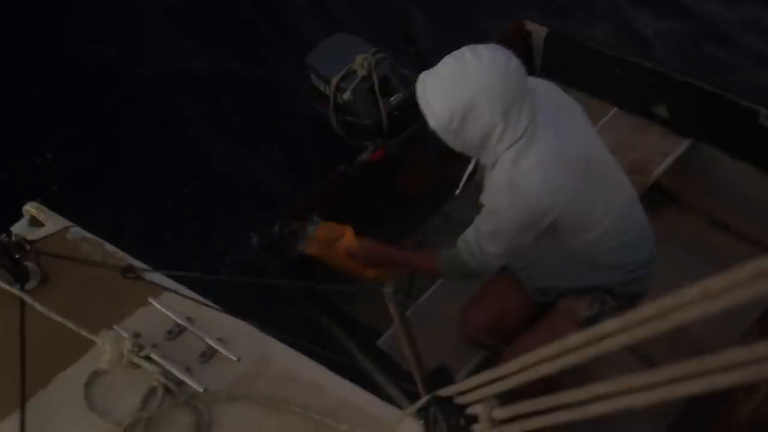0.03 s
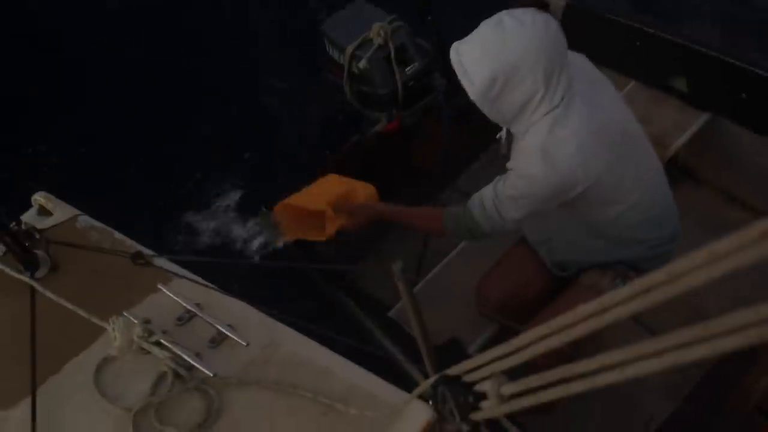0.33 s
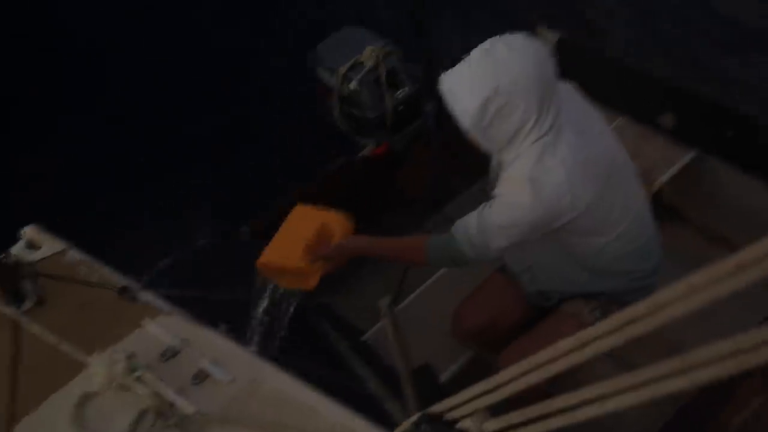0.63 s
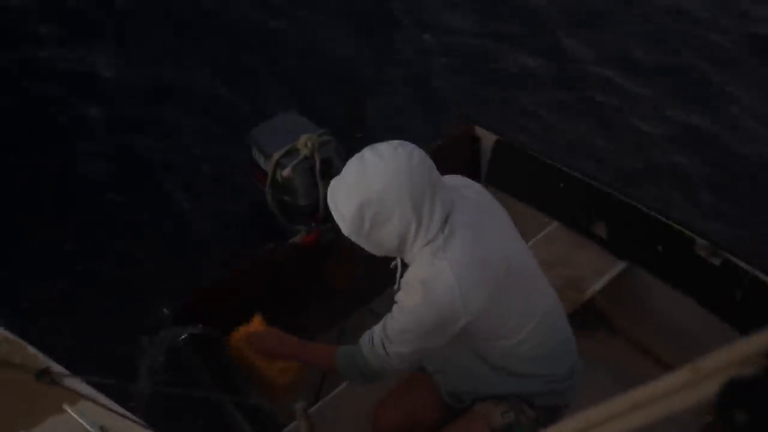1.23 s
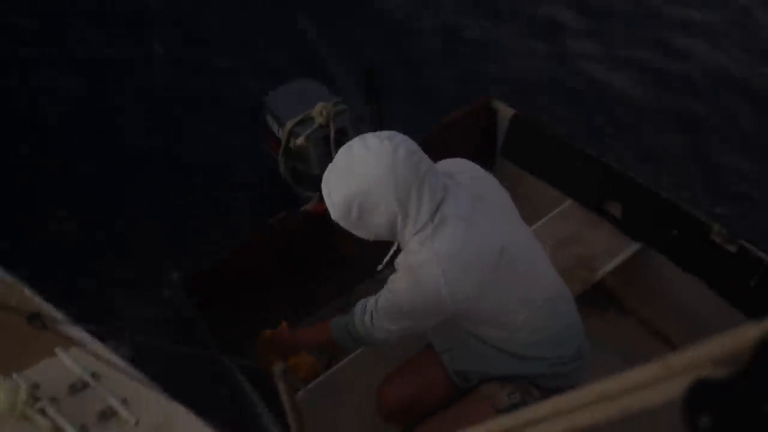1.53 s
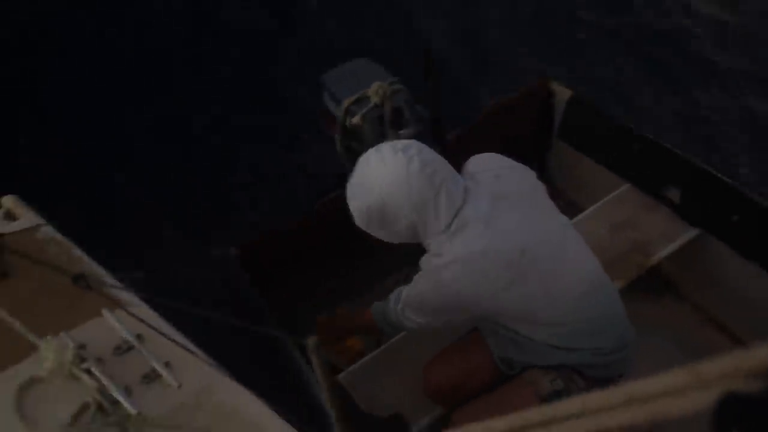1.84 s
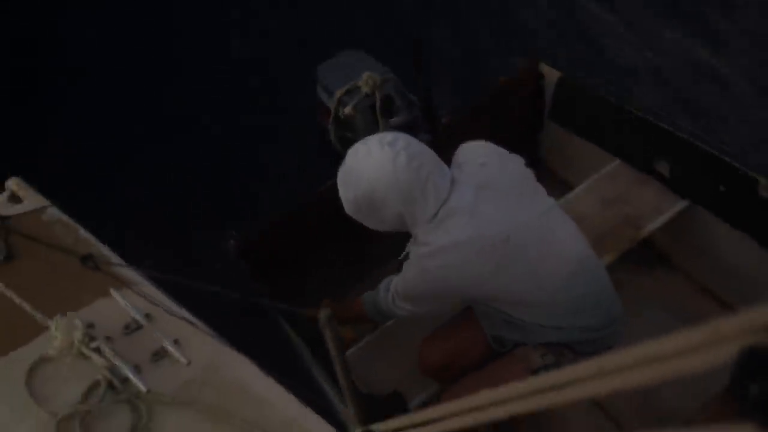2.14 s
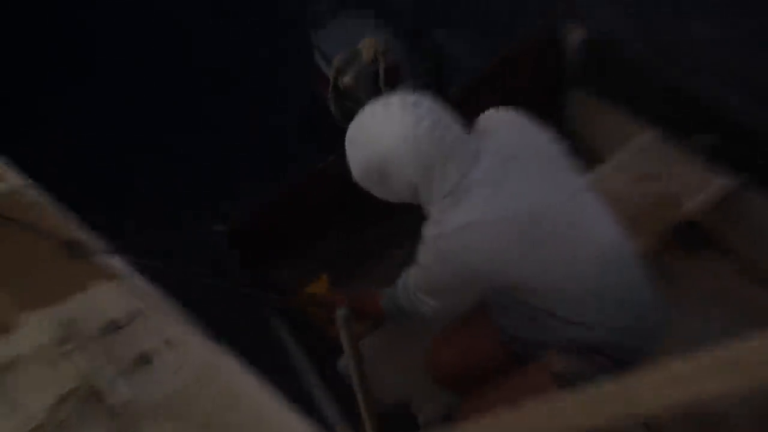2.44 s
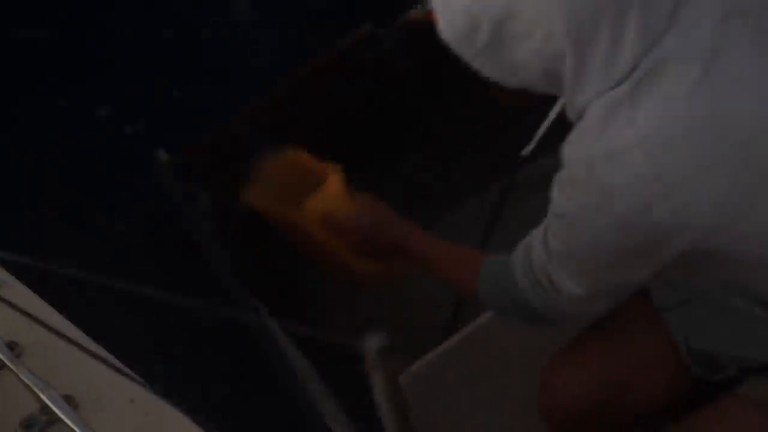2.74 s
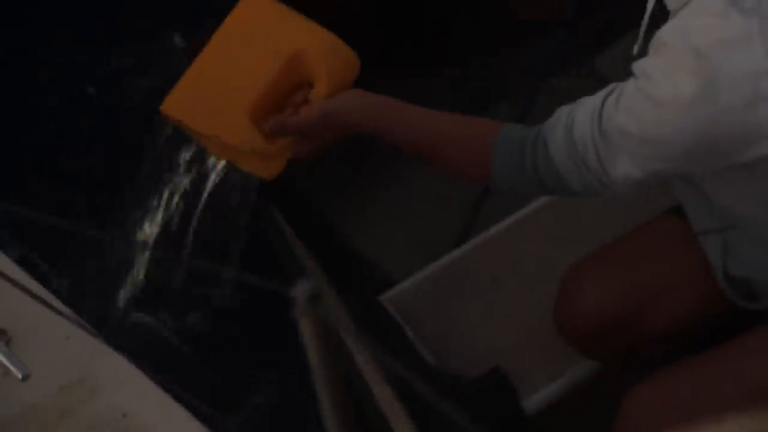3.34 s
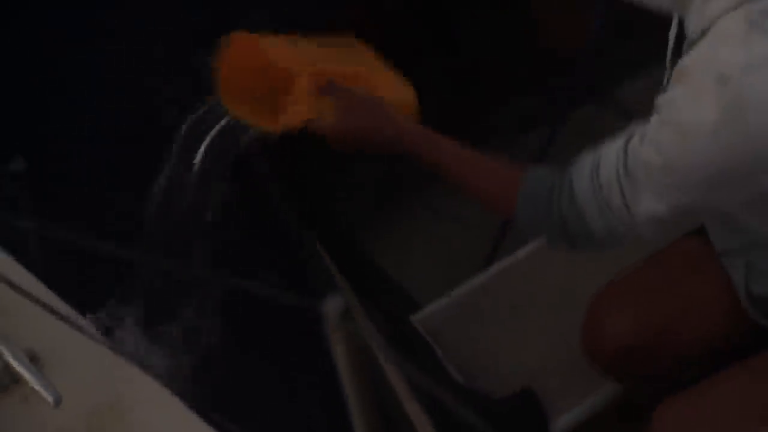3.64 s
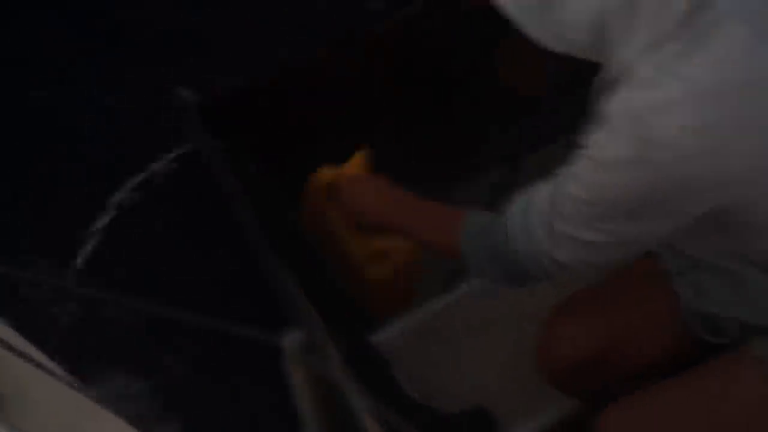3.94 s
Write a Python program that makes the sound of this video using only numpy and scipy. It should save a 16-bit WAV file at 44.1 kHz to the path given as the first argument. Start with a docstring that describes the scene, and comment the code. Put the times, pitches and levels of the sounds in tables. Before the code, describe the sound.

Repeated splashes of water, scooped out of a small open boat and poured into the sea, come with plinking drops and a few scoop ticks, growing fuller near the end. Low, lumpy wind gusts rumble on the microphone throughout.

```python
"""Bailing a boat in wind

A small open boat is bailed with a plastic scoop on a windy sea. Turbulence buffets the microphone in
low, lumpy gusts. Thrown and sloshing water patters as a spray of tiny impacts and rings with the
resonance of trapped bubbles. Single drops plink, sheets of water slap down and the scoop ticks;
the boat's sides scatter these water sounds in a short echo."""
import sys
import numpy as np
from scipy import signal
from scipy.fft import rfft, irfft
from scipy.io import wavfile
from scipy.ndimage import uniform_filter1d

SR = 44100
rng = np.random.default_rng(int(sys.argv[2]) if len(sys.argv) > 2 else 0)


def file_out(sig):
    """Save sig as 16-bit WAV at sys.argv[1]."""
    # one column per channel
    cols = np.atleast_2d(sig).T
    # limit, then scale
    lim = np.clip(cols, -1, 1)
    pcm = np.round(lim * 32767).astype(np.int16)
    wavfile.write(sys.argv[1], SR, pcm)


N = 176400
T = np.arange(N) / SR


def from_db(db):
    """Amplitude ratio of a level in decibels."""
    return 10 ** (np.asarray(db) / 20)


def unit_rms(x):
    """Normalisation to rms 1."""
    return x / np.sqrt(np.mean(x ** 2) + 1e-20)


def envelope(rows):
    """Amplitude envelope through (t/s, level/dB) points."""
    return from_db(np.interp(T, *np.transpose(rows)))


def coloured(x, spectrum):
    """Minimum-phase filtering by a (f/Hz, level/dB) curve, scaled to rms 1."""
    hz, db = np.transpose(spectrum)
    shape = np.interp(np.log(np.arange(N // 2 + 1) * SR / N + 1), np.log(hz), db)
    cepstrum = irfft(np.log(from_db(shape)), N)
    cepstrum[1:N // 2] *= 2   # folding the cepstrum makes the filter causal
    cepstrum[N // 2 + 1:] = 0
    return unit_rms(irfft(rfft(x) * np.exp(rfft(cepstrum)), N))


def drift(corner_hz):
    """Random modulation: low-passed noise of rms 1."""
    step, settle = 40, 2000
    pole = np.exp(-2 * np.pi * corner_hz * step / SR)
    noise = rng.standard_normal(N // step + settle + 2)
    slow = signal.lfilter([1], [1, -2 * pole, pole * pole], noise)[settle:]
    return np.interp(np.arange(N) / step, np.arange(len(slow)), unit_rms(slow))


def evened(x, span_s):
    """Division by the running rms steadies the level and keeps the fast grain."""
    size = max(int(span_s * SR), 2)
    power = uniform_filter1d(uniform_filter1d(x ** 2, size), size)
    return x / np.sqrt(np.abs(power) + 1e-9)


def add(out, start_s, sound):
    """Superposition of a sound at a given time."""
    i = int(np.clip(start_s * SR, 0, N - 1))
    out[i:i + len(sound)] += sound[:N - i]


def patter(per_s, spread_db, clump_db):
    """Shot noise: random impacts of uneven size, modulated into clumps."""
    sizes = from_db(spread_db * np.minimum(rng.exponential(1, N), 4.5)) * rng.choice([-1, 1], N)
    hits = rng.random(N) < per_s / SR
    return unit_rms(hits * sizes * from_db(clump_db * drift(142)))


def resonator(x, hz, cycles):
    """A damped resonance that falls 60 dB in the given number of cycles."""
    radius, angle = from_db(-60 * hz / (cycles * SR)), 2 * np.pi * hz / SR
    feedback = [1, -2 * radius * np.cos(angle), radius * radius]
    return signal.lfilter([1, 0, -1], feedback, x + 1e-18) * (1 - radius)


def bubble(hz, t60, rise=0.064):
    """Free oscillation of trapped air: a damped sine whose pitch climbs by the fraction `rise`."""
    t = np.arange(int(t60 * SR) + 2) / SR
    phase = 2 * np.pi * hz * (t + rise * t * t / (2 * t60))
    attack = 1 - np.exp(-t * hz)
    return np.sin(phase) * from_db(-60 * t / t60) * attack


def swarm(per_s, low_hz, high_hz, cycles, spread_db):
    """Incoherent sum of bubbles of random strength and pitch, at a steady level."""
    out, candidates = np.zeros(N), 4000
    for when, pitch, size, life, chance in rng.random(size=(candidates, 5)):
        if chance < per_s * N / SR / candidates:
            hz = low_hz * (high_hz / low_hz) ** pitch
            gain = from_db(spread_db * min(-np.log(size), 4))
            add(out, when * N / SR, gain * bubble(hz, cycles * (.5 + life) / hz))
    return evened(out, 0.11)


# Spectrum of the open sea: f/Hz, level/dB
SEA_SPECTRUM = [(300, 9), (800, 1), (1600, -15), (3700, -8), (5000, -13), (9000, -36.5), (15500, -15)]

def sea():
    """Stationary noise: the faint wash of the open sea."""
    return from_db(-67.5) * coloured(rng.standard_normal(N), SEA_SPECTRUM)


# Strength of the wind: t/s, level/dB
WIND_LEVEL = [(0.08, -27), (0.25, -23), (0.31, -22), (0.37, -26), (0.5, -22.5), (0.6, -25.5), (0.67, -25.5),
              (0.79, -23), (0.85, -29), (1.02, -20), (1.08, -28), (1.21, -26), (1.26, -33.5), (1.38, -34),
              (1.43, -27.5), (1.6, -27), (1.9, -25.5), (2.1, -24), (2.38, -28.5), (2.48, -22),
              (2.55, -29.5), (2.7, -23.5), (2.95, -27), (3.04, -32.5), (3.13, -24.5), (3.29, -27.5),
              (3.36, -30), (3.75, -29.5), (3.84, -22.5), (3.94, -31.5), (4.0, -27.5)]
# Spectra of coarse and of fine turbulence: f/Hz, level/dB
RUMBLE_SPECTRUM = [(12, -30.5), (25, -19.5), (55, -17), (75, -9), (100, -0.5), (122, 0.5), (160, -3),
                   (210, -10.5), (300, -19.5), (450, -42), (800, -62), (1600, -100)]
RUSH_SPECTRUM = [(90, -30.5), (200, 3.5), (300, 1), (420, -7.5), (600, -17), (1000, -33.5), (2500, -76.5)]

def wind():
    """Turbulent pressure fluctuation: a low rumble and a finer rush follow the same gusts."""
    gusts = envelope(WIND_LEVEL) * from_db(drift(4.1))
    rumble = evened(coloured(rng.standard_normal(N), RUMBLE_SPECTRUM), 0.083)
    rush = coloured(rng.standard_normal(N) * from_db(2.54 * drift(37)), RUSH_SPECTRUM)
    return from_db(1) * gusts * rumble + from_db(-37) * unit_rms(gusts) * rush


# Low thumps, mostly eddies hitting the microphone: t/s, level/dB, width/s, f/Hz, puff level/dB
EDDIES = [(.298, -10.5, 0.022, 123, -44), (.497, -17.5, 0.0087, 165, -47), (.579, -13.5, 0.0063, 131, -40),
          (.612, -21.5, 0.011, 180, -28.5), (.843, -15.5, 0.023, 115, -36.5), (.943, -22, 0.008, 134, -30),
          (1.163, -12, 0.003, 161, -24.5), (1.431, -13, 0.0036, 141, -47), (1.495, -14.5, 0.0054, 131, -40),
          (1.771, -13, 0.011, 118, -34.5), (2.119, -8, 0.0031, 158, -19), (2.200, -12, 0.0091, 149, -23),
          (2.321, -13.5, 0.009, 166, -19.5), (2.335, -18, 0.0017, 460, -32),
          (2.344, -15.5, 0.0072, 143, -28), (2.751, -17.5, 0.0066, 156, -28),
          (2.812, -12.5, 0.0027, 140, -19), (3.284, -13.5, 0.011, 116, -42), (3.460, -16, 0.0044, 163, -28),
          (3.503, -11.5, 0.0015, 191, -40), (3.603, -8, 0.0038, 157, -25.5),
          (3.660, -11.5, 0.0031, 141, -26.5), (3.683, -13, 0.0026, 153, -42),
          (3.794, -13, 0.0031, 172, -30.5), (3.853, -12, 0.0089, 150, -29)]

def eddies():
    """Each eddy is a Gaussian pulse: a short swing of pressure with a rough puff."""
    out = np.zeros(N)
    puff = evened(coloured(rng.standard_normal(N), RUSH_SPECTRUM), 0.093)
    for centre_s, db, width_s, hz, puff_db in EDDIES:
        near = np.abs(T - centre_s) < 4 * width_s
        t = T[near] - centre_s
        swing = from_db(db) * np.cos(2 * np.pi * (hz * t + rng.random()))
        out[near] += np.exp(-.5 * (t / width_s) ** 2) * (swing + from_db(puff_db) * puff[near])
    return out


# Gurgle where water plunges in: t/s, level/dB
GURGLE_LEVEL = [(0.08, -53.5), (0.19, -49), (0.25, -41.5), (0.32, -57), (0.58, -68), (0.71, -35.5),
                (0.82, -43.5), (0.91, -37.5), (1.0, -45), (1.45, -47), (1.58, -54), (1.75, -58),
                (1.87, -46.5), (2.06, -62), (2.16, -43.5), (2.47, -43.5), (2.54, -51.5), (2.79, -49.5),
                (2.98, -41), (3.1, -52.5), (3.24, -46), (3.32, -61.5), (3.42, -40.5), (3.58, -32.5),
                (3.63, -42.5), (3.85, -39.5), (4.0, -51.6)]
# Spectrum of the churning under the stream: f/Hz, level/dB
CHURN_SPECTRUM = [(120, -27), (300, 4), (500, 1), (800, -1.5), (1150, -3.5), (1700, -16), (3000, -33.5)]

def gurgle():
    """Air entrainment: plunging water churns and traps large, low-pitched bubbles."""
    bubbles = swarm(per_s=480, low_hz=711, high_hz=1896, cycles=17, spread_db=2.5)
    churn = evened(coloured(patter(per_s=1200, spread_db=2, clump_db=5.5), CHURN_SPECTRUM), 0.2)
    return (from_db(-3.5) * bubbles + from_db(-6) * churn) * envelope(GURGLE_LEVEL)


# Strength of the fine spray: t/s, level/dB
SPRAY_LEVEL = [(0.08, -52.5), (0.19, -61.5), (0.27, -55), (0.4, -68.5), (0.54, -52), (0.63, -54),
               (0.85, -63.5), (0.92, -52.5), (0.99, -62.5), (1.05, -55.5), (1.22, -64), (1.33, -63),
               (1.48, -48.5), (1.56, -72), (1.75, -65.5), (1.87, -60.5), (2.15, -60.5), (2.53, -69),
               (2.75, -65.5), (2.93, -59.5), (3.12, -65), (3.32, -64), (3.39, -48.5), (3.48, -59.5),
               (3.58, -46), (3.63, -54), (3.9, -62), (4.0, -56)]
# Its spectrum: f/Hz, level/dB
SPRAY_SPECTRUM = [(2500, -6), (4800, -5), (6500, 2.5), (8500, -1), (11000, -2), (15500, 3)]

def spray(spurts):
    """Impulse excitation: fine droplets ping at high pitches amid hiss and tinkling bubbles."""
    pitches = np.geomspace(4300, 13500, num=18)
    pings = sum(resonator(patter(3200 / len(pitches), spread_db=3.5, clump_db=7.5), hz, cycles=16)
                for hz in pitches)
    droplets = unit_rms(pings) + from_db(-5) * rng.standard_normal(N)
    mist = from_db(-3) * evened(coloured(droplets, SPRAY_SPECTRUM), 0.052)
    tinkle = from_db(-5) * swarm(per_s=460, low_hz=4980, high_hz=10000, cycles=17, spread_db=3.5)
    return (mist + tinkle) * envelope(SPRAY_LEVEL) * from_db(2 * spurts)


# Strength of the splashing: t/s, level/dB
SPLASH_LEVEL = [(0.08, -40.5), (0.19, -45.5), (0.29, -47), (0.34, -53.5), (0.42, -51.5), (0.61, -49),
                (0.73, -44.5), (0.86, -48), (0.92, -49), (0.99, -48.5), (1.07, -44), (1.22, -52),
                (1.27, -47.5), (1.47, -49.5), (1.56, -59), (1.75, -55.5), (1.87, -51), (2.06, -51),
                (2.18, -45.5), (2.42, -47), (2.53, -55), (2.59, -51.5), (2.78, -55), (2.9, -44),
                (3.0, -46.5), (3.11, -51.5), (3.22, -47), (3.33, -55), (3.39, -41.5), (3.57, -41),
                (3.64, -44.5), (3.74, -42), (4.0, -46)]
# Spectrum of water striking water: f/Hz, level/dB
SPLASH_SPECTRUM = [(500, -7), (900, 0.5), (1600, -2), (2600, -2), (3400, 0), (4000, 0), (4900, -14),
                   (7000, -17), (10000, -24.5), (15500, -46)]

def splash(spurts):
    """Impact noise of water on water, in a soft wash with a fizz of small bubbles."""
    impacts = patter(per_s=1500, spread_db=4.5, clump_db=5)
    wash = from_db(4.5) * rng.standard_normal(N)
    body = from_db(-1.5) * evened(coloured(impacts + wash, SPLASH_SPECTRUM), 0.052)
    fizz = from_db(-6.5) * swarm(per_s=300, low_hz=1552, high_hz=4540, cycles=25, spread_db=1.5)
    return (body + fizz) * envelope(SPLASH_LEVEL) * from_db(1.8 * spurts)


# Single drops and large bubbles: t/s, level/dB, f/Hz
PLINKS = [(0.123, -35, 1100), (.237, -27, 590), (0.251, -36, 910), (.300, -31.5, 3540), (.364, -36, 3600),
          (.370, -34, 1860), (.599, -29, 3740), (.625, -31, 4100), (0.694, -30, 1010), (.729, -24, 815),
          (.872, -30, 816), (1.024, -34, 1390), (1.459, -29.5, 3900), (1.518, -31, 1070),
          (1.618, -42, 1226), (1.782, -29, 1060), (1.795, -33.5, 2540), (1.954, -29, 1980),
          (1.966, -34.5, 4060), (2.071, -31, 3550), (2.073, -31, 4430), (2.134, -31, 2180),
          (2.152, -31, 784), (2.676, -38, 3220), (2.696, -37.5, 2500), (2.853, -33, 2130),
          (1.839, -47, 6100), (2.630, -50, 6140), (3.243, -43.5, 5770), (3.053, -32.5, 980),
          (3.272, -33, 1660), (3.318, -37.5, 3530), (3.409, -25.5, 764), (3.441, -25, 1000),
          (3.511, -26, 974), (3.74, -27.5, 1870), (3.883, -32, 3450)]

def drops(gap_s=0.0043, loss_db=4.5, pitch_spread=0.1095, spatter_fall_s=0.0098):
    """Bubble resonance: each drop spatters and traps three bubbles, each weaker than the last."""
    out = np.zeros(N)
    spatter = coloured(patter(per_s=5000, spread_db=2.5, clump_db=9), SPLASH_SPECTRUM)
    for start_s, db, hz in PLINKS:
        gain = from_db(db + 0.5)
        t60 = 0.022 * (2000 / hz) ** 0.58   # larger, lower bubbles ring longer
        for k, (late, detune) in enumerate(rng.random(size=(3, 2))):
            pitch = hz * (1 + pitch_spread * k * (2 * detune - 1))
            delay_s = k * gap_s * (.5 + late)
            add(out, start_s + delay_s, gain * from_db(-loss_db * k) * bubble(pitch, t60))
        impact = spatter[int(start_s * SR):][:SR // 20]
        decay = np.exp(-T[:len(impact)] / spatter_fall_s)
        add(out, start_s, gain * from_db(-15.5) * impact * decay)
    return out


# Sheets of water landing: t/s, level/dB, decay time/s, treble gain/dB
SHEETS = [(0.067, -33.5, 0.0057, 18), (0.086, -32.5, 0.003, 20), (0.264, -33.5, .006, 11),
          (0.512, -36, 0.0014, 24.5), (0.543, -46.5, 0.0043, 23.5), (0.622, -37.5, 0.011, 14.5),
          (0.682, -42.5, 0.01, 17.5), (0.906, -37.5, 0.031, -3), (1.4846, -24, 0.0054, 7.5),
          (1.489, -25, 0.0097, -6), (1.852, -30, 0.015, -12), (1.974, -39.5, 0.012, 9),
          (2.118, -35, 0.003, 10), (2.797, -42, 0.0016, 24), (3.571, -26, 0.023, -4),
          (3.650, -40, 0.0052, 19), (3.709, -41, 0.022, 9.5)]
# Spectrum of a slap: f/Hz, level/dB
SLAP_SPECTRUM = [(70, 0), (140, 10), (300, 21.5), (700, 11.5), (1500, 2.5), (2400, 6), (3400, 7.5),
                 (4200, 3), (5000, -14.5), (8000, -11.5), (15500, -29)]

def slaps(attack_s=0.0022, crossover_hz=4900):
    """Impact transient: a sheet of water lands as a dense burst that decays exponentially."""
    burst = evened(coloured(patter(per_s=9000, spread_db=3, clump_db=1), SLAP_SPECTRUM), .004)
    treble = signal.sosfilt(signal.butter(2, crossover_hz, "high", fs=SR, output="sos"), burst)
    body = signal.sosfilt(signal.butter(2, crossover_hz, "low", fs=SR, output="sos"), burst)
    out = np.zeros(N)
    for start_s, db, fall_s, treble_db in SHEETS:
        near = (T > start_s) & (T < start_s + 10 * fall_s)
        t = T[near] - start_s
        shape = np.minimum(t / attack_s, 1) * np.exp(-t / fall_s)
        slap = body[near] - from_db(treble_db) * treble[near]   # minus: the bands are in antiphase
        out[near] += from_db(db) * shape * slap
    return out


# Ticks of the scoop and of hard drops on the boat: t/s, peak level/dB, f/Hz
CONTACTS = [(2.1346, -26.5, 4700), (2.403, -32.5, 4660), (2.5828, -33, 2960), (2.588, -27, 3700),
            (2.596, -41, 4200), (2.650, -36, 6500), (3.408, -29, 6000), (2.714, -39.5, 6000),
            (2.811, -35, 3800), (3.034, -34, 6000), (3.059, -31.5, 4000), (3.5864, -23, 3260),
            (3.5907, -14, 3400)]

def ticks(spatter_fall_s=0.0012):
    """Impulse response: a hard contact and a faint spatter excite a heavily damped resonance."""
    out, t = np.zeros(N), T[:SR // 20]
    impulse = t == 0
    for start_s, db, hz in CONTACTS:
        spatter = from_db(-16.5) * rng.standard_normal(len(t)) * np.exp(-t / spatter_fall_s)
        lowpass = signal.butter(2, min(2 * hz, SR / 3), fs=SR, output="sos")
        tick = resonator(signal.sosfilt(lowpass, impulse + spatter), hz, cycles=9.2)
        add(out, start_s, from_db(db) * tick / np.abs(tick).max())
    return out


def hull_echo(x, t60=0.029, delay_s=.002):
    """Early reflections: convolution with a short scatter from the boat's sides."""
    t = T[:SR // 8]
    echoes = rng.standard_normal(len(t)) * from_db(-60 * t / t60) * (t > delay_s)
    return signal.fftconvolve(x, echoes / np.linalg.norm(echoes))[:N]


def scene():
    """Superposition of sea, wind and bailed water in one channel."""
    spurts = drift(26)   # splash and spray arrive in the same uneven spurts
    water = splash(spurts) + spray(spurts) + gurgle() + drops() + slaps() + ticks()
    return (sea() + wind() + eddies() + water + from_db(-9.5) * hull_echo(water))[None]


def record(dry):
    """Gating and band limiting: a moment of silence, then the sound through a steep low-pass."""
    start_s, fade_s, stopband_hz = .069, .002, 16600
    gate = np.clip((T - start_s) / fade_s, 0, 1)
    return signal.sosfilt(signal.cheby2(20, 80, stopband_hz, fs=SR, output="sos"), dry * gate)


dry = scene()
out = record(dry)
file_out(out)
```